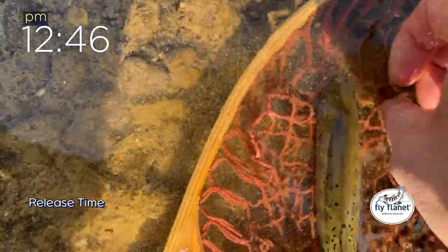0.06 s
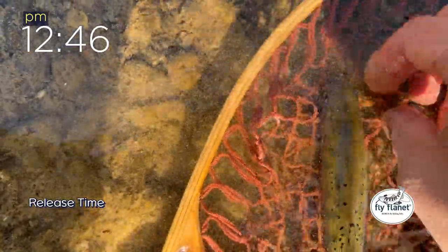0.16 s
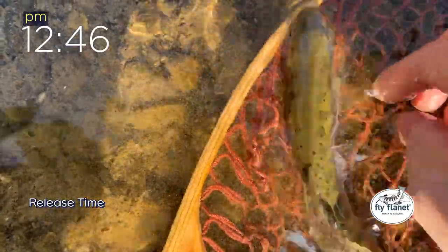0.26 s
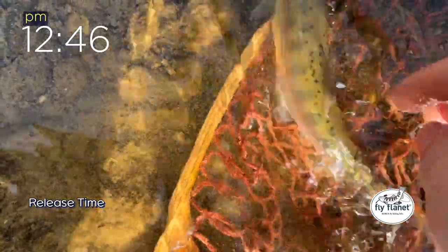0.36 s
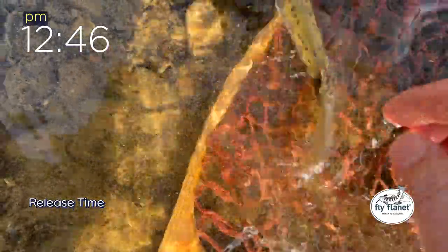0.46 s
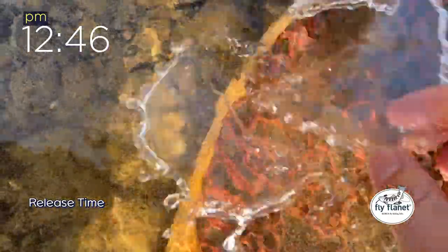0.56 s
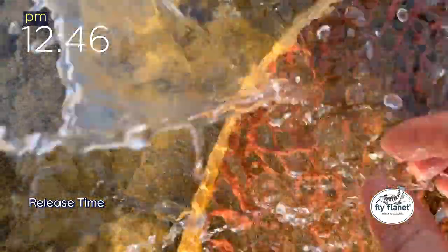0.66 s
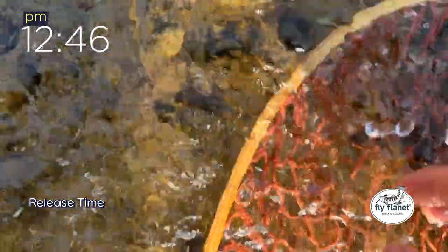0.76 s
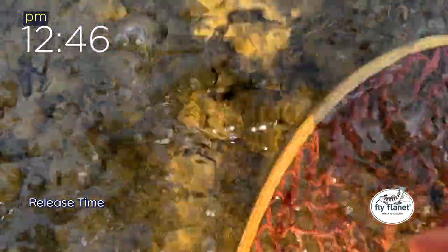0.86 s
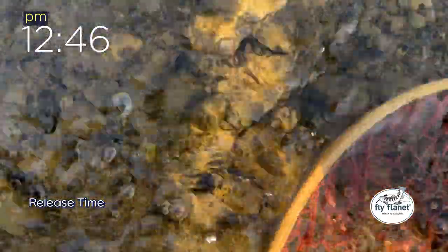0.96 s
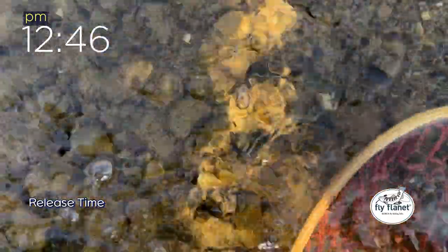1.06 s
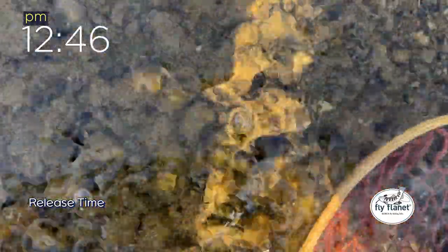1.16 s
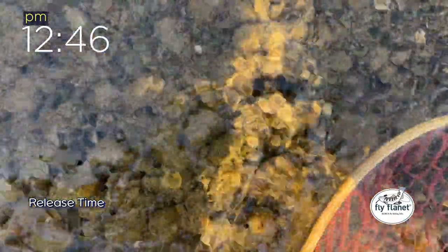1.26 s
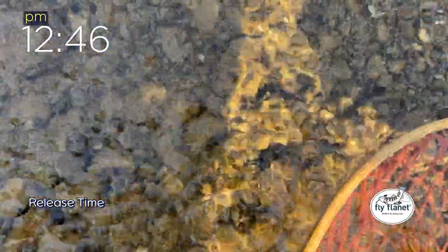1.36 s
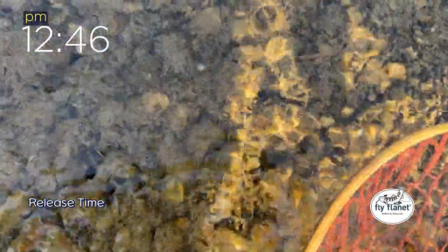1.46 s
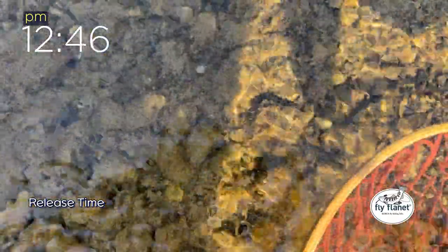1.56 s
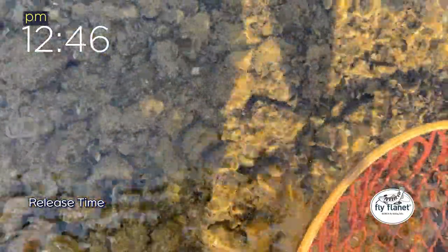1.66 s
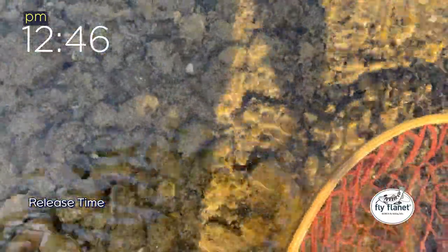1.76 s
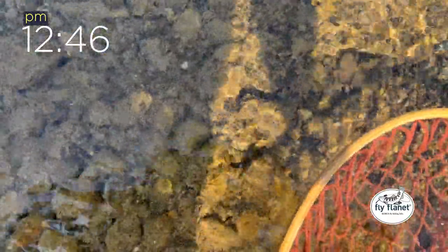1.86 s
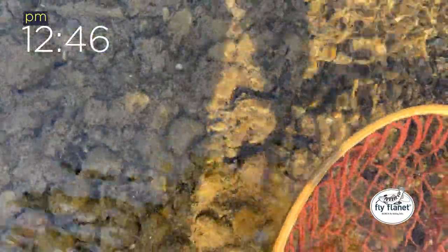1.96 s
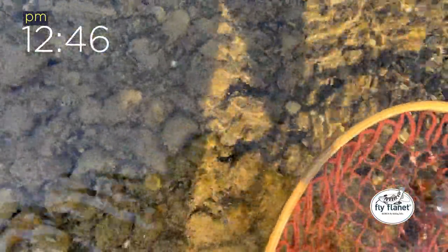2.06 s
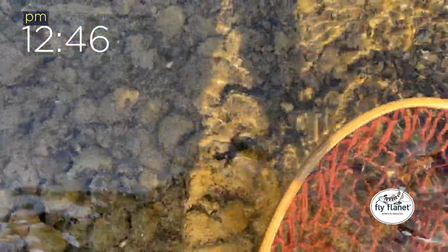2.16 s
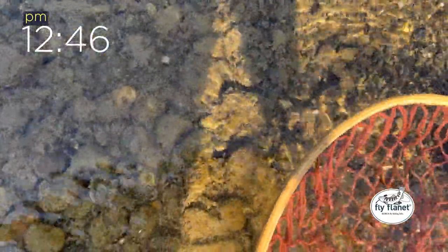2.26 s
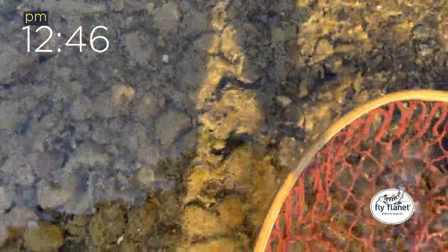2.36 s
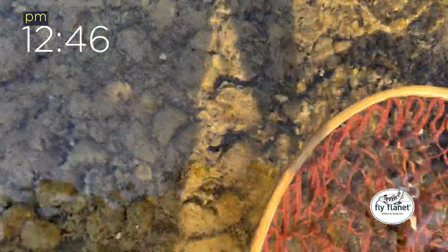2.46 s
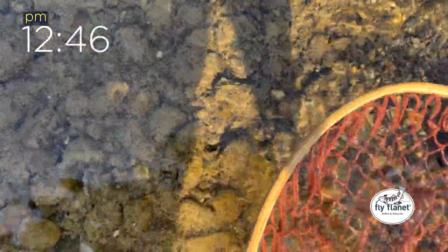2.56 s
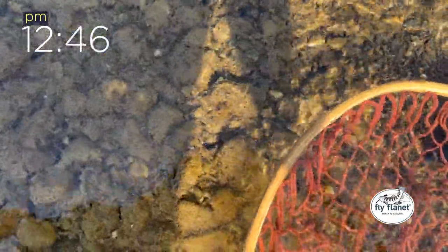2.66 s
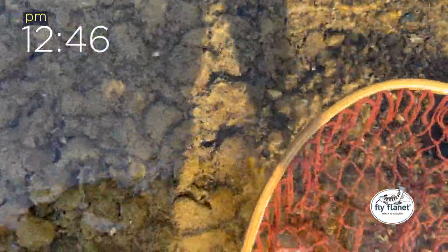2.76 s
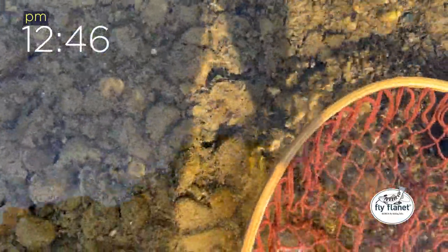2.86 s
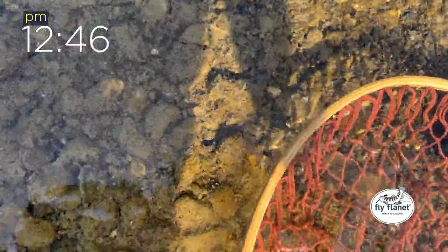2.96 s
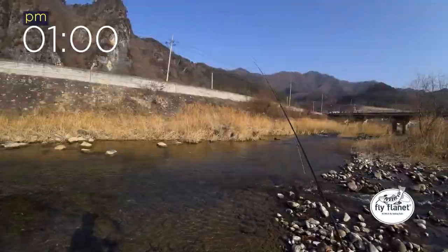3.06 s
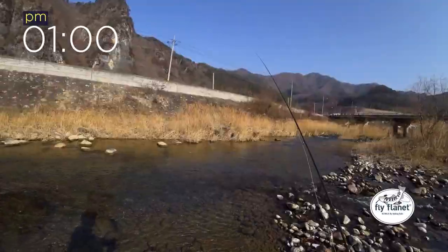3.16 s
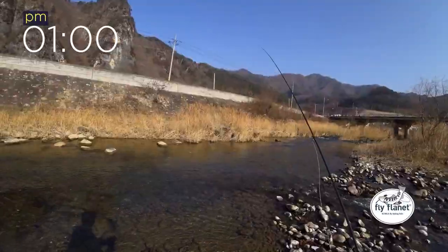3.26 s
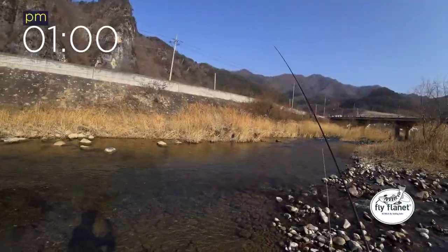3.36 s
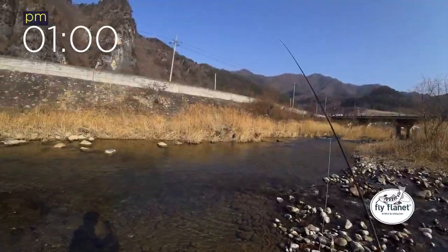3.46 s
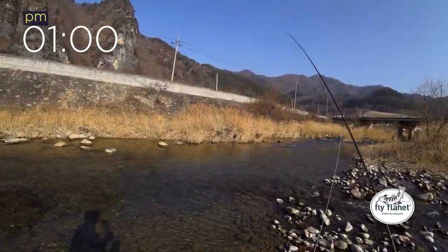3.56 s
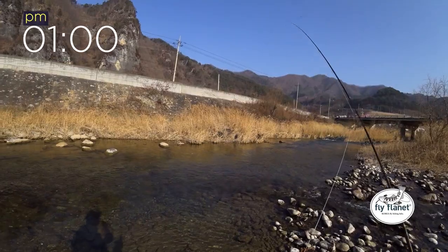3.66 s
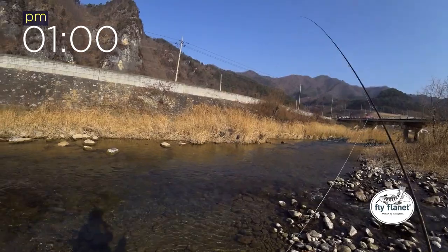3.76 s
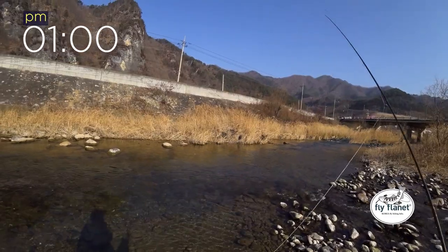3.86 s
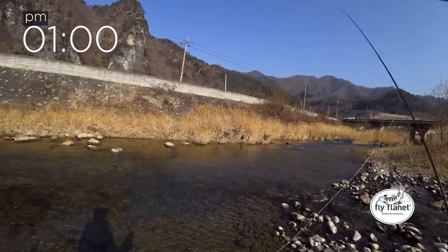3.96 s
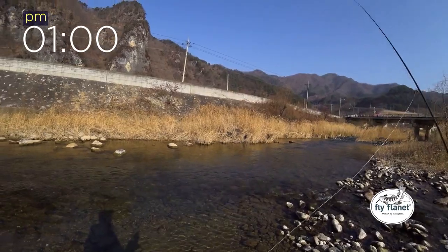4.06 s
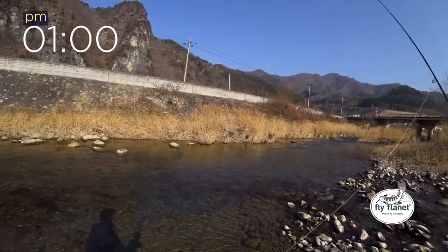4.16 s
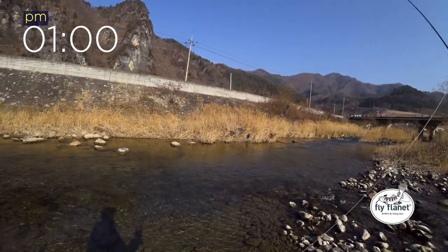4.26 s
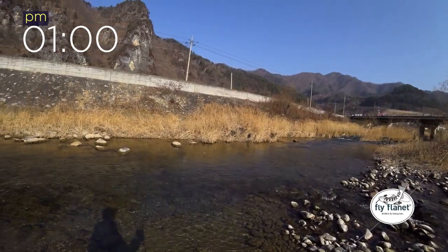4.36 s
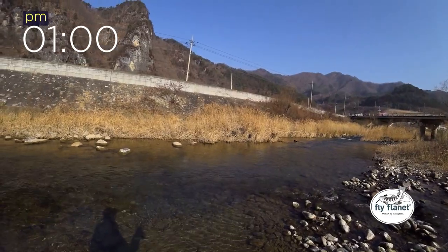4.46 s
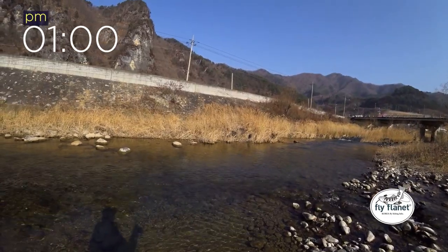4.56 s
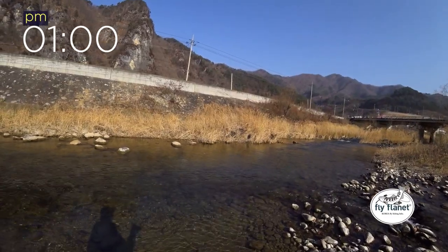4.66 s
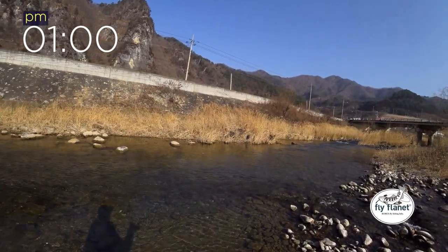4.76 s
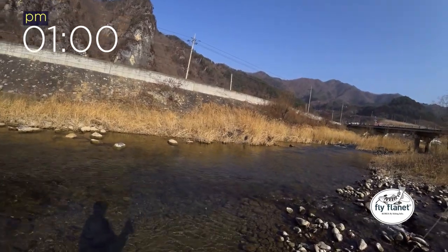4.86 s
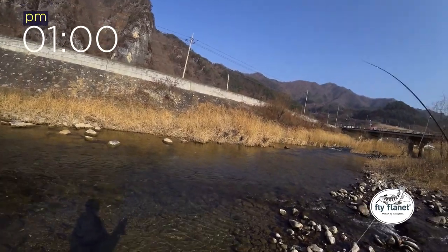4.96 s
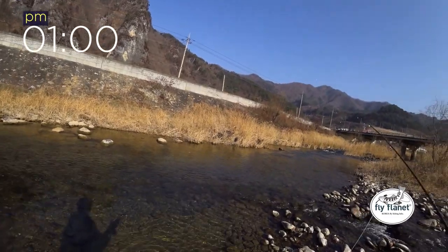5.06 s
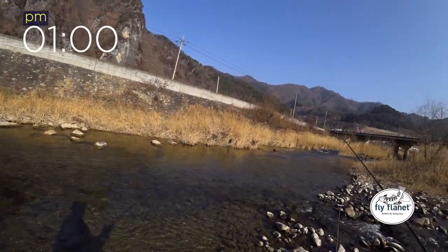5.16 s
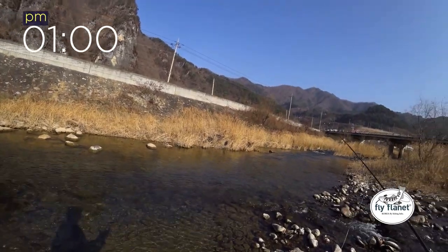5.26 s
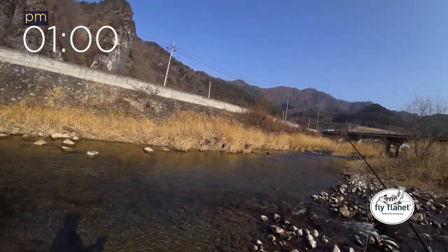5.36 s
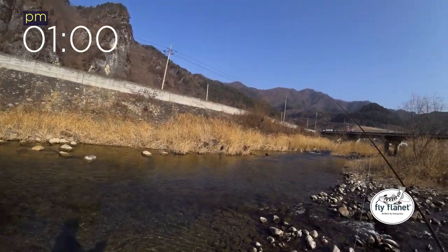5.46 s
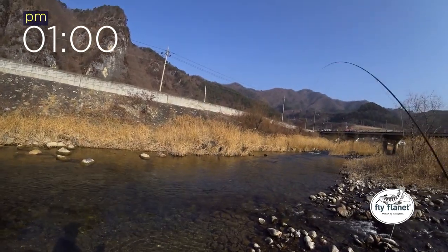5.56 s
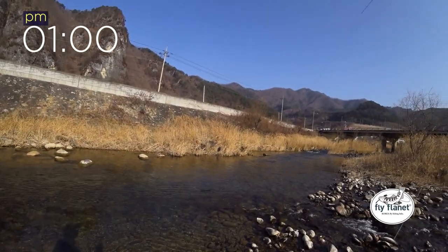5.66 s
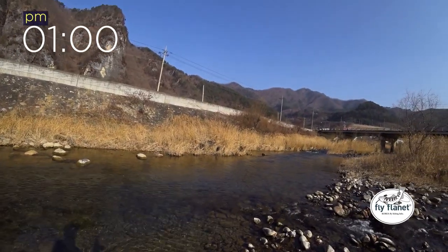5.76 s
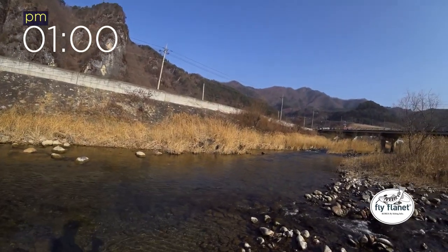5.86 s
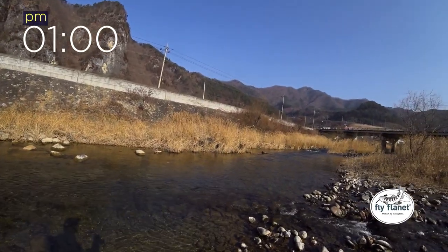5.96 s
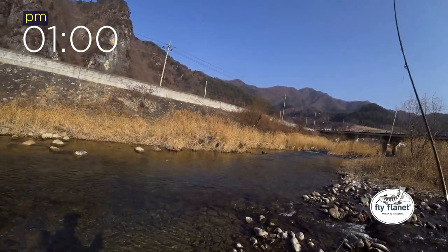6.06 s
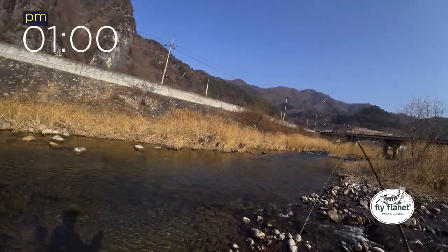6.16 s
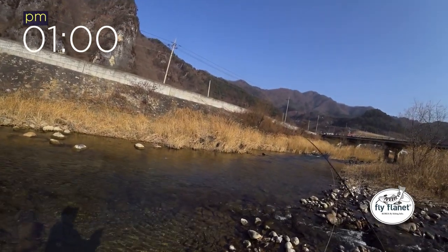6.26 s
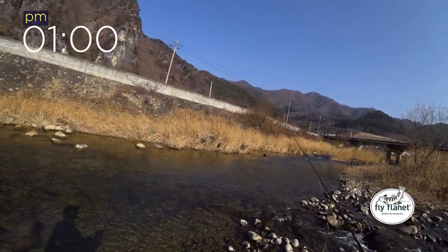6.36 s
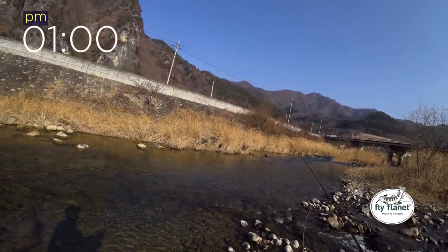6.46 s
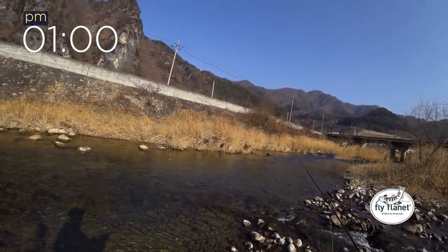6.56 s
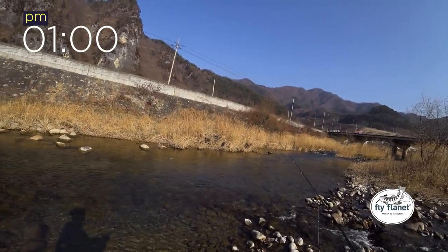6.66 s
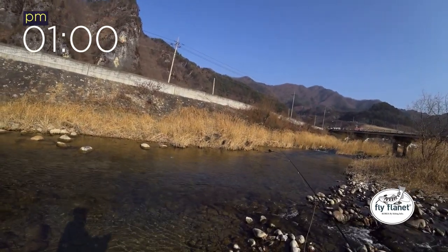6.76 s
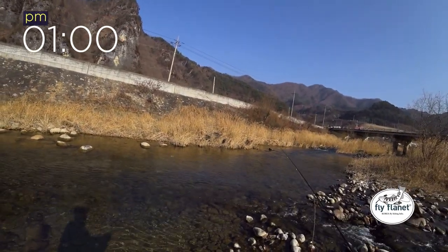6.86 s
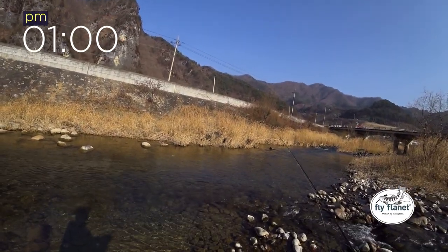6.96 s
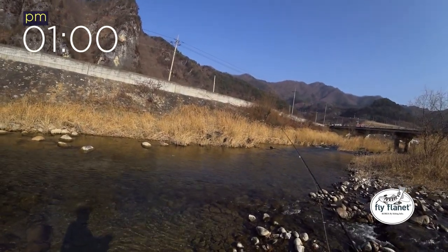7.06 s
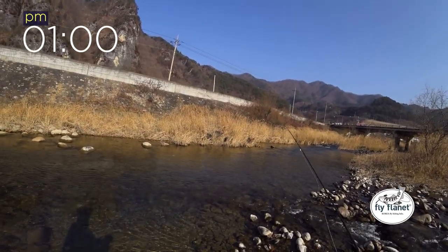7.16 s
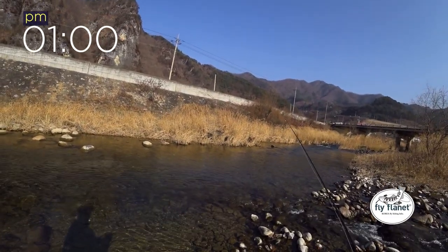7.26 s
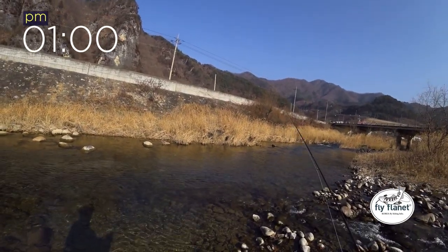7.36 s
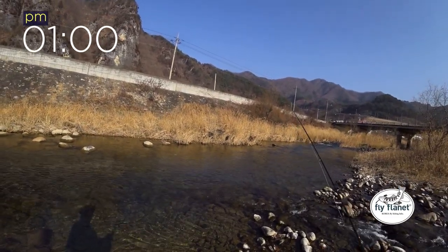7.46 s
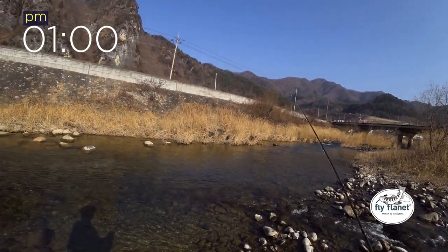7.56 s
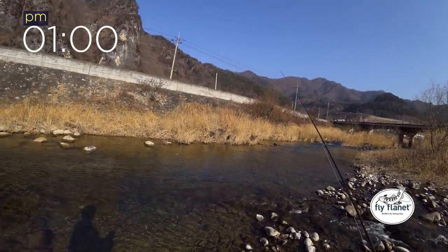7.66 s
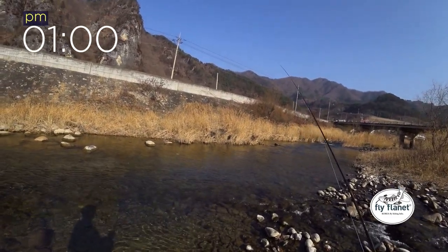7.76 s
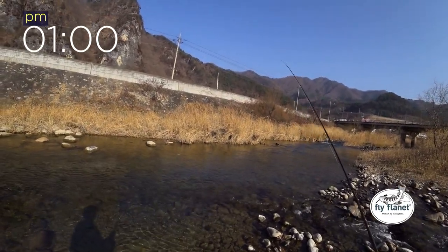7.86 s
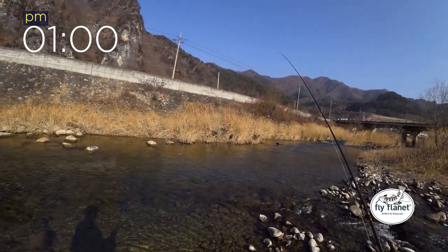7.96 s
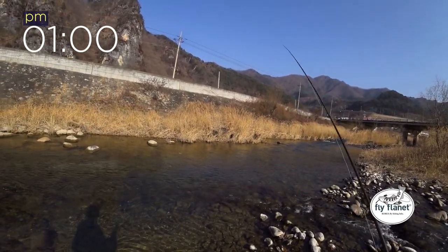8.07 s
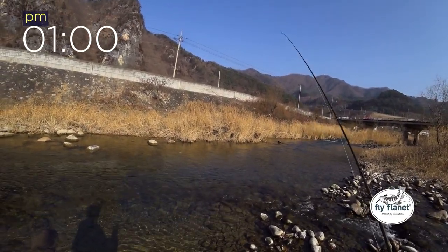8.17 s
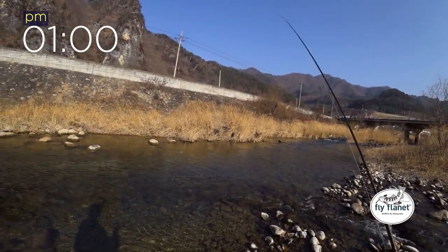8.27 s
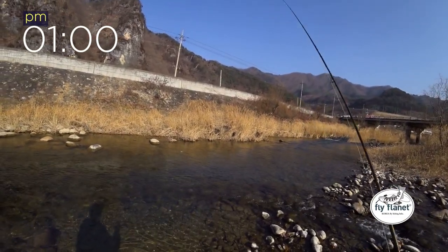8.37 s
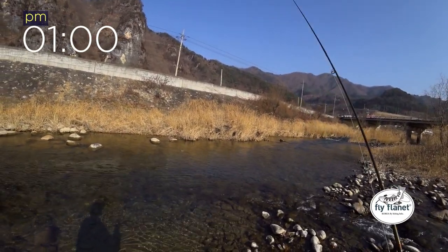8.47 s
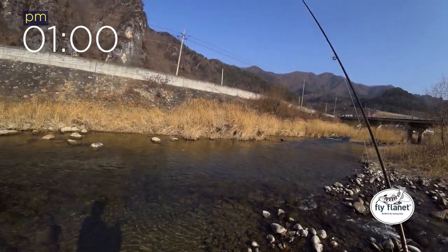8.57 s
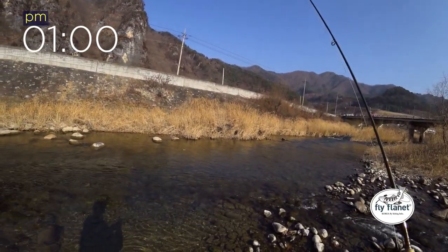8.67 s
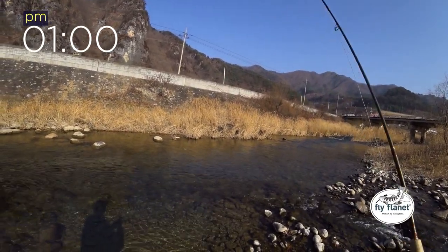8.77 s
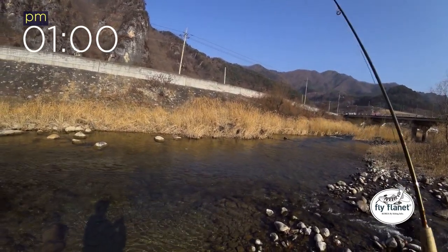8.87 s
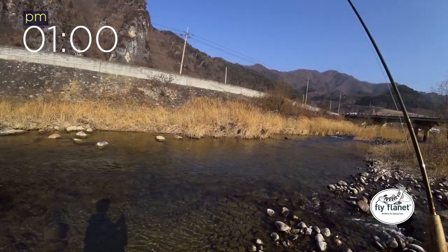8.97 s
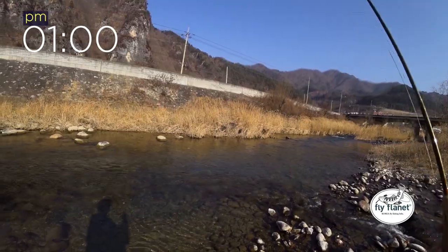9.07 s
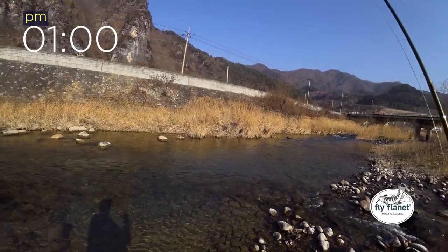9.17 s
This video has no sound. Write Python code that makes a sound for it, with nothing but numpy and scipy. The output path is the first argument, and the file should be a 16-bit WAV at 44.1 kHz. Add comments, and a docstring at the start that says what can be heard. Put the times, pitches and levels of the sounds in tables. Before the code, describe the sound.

A fish splashes away in a shallow trickling stream, then a river rushes while fishing line ticks through a rod's rings.

```python
"""A fish splashes off from a landing net in shallow water: its tail slaps, bubbles rise and drops patter, over
a fizzing stream and the hum of a far road. With a low thump the place changes at once to an open river bank: a
riffle rushes, the reel's ratchet clicks as line is pulled off, the line ticks on the rod rings and the rod
knocks now and then. Bubbles, drops and rod all sound as damped resonators; running water is a great many
bubbles ringing at random over smooth noise."""
import sys
import numpy as np
from scipy import signal
from scipy.fft import rfft, irfft, next_fast_len
from scipy.io import wavfile
from scipy.ndimage import uniform_filter1d

SR = 44100
rng = np.random.default_rng(int(sys.argv[2]) if len(sys.argv) > 2 else 0)


def master(y):
    """Save y as 16-bit WAV."""
    cut = np.clip(np.atleast_2d(y).T, -1, 1)
    pcm = np.round(cut * 32767)  # scale
    wavfile.write(sys.argv[1], SR, pcm.astype(np.int16))


N = 405719
TIME_S = np.arange(N) / SR
SPLASH_PAN_DB, BANK_PAN_DB = 0.9, 8   # pan is left minus right: the rod lies to the left
PLOP_T60_S, PLOP_CYCLES = 0.014, 17.0   # larger bubbles ring longer


# slaps of the tail: start_s, t60_s, level_db
TAIL_SLAPS = [(.085, 0.053, -52), (0.304, 0.16, -41.5), (.333, .17, -48), (.365, 0.27, -44),
              (.398, 0.12, -44), (.425, .12, -44), (.448, 0.086, -46), (.487, 0.13, -44),
              (0.542, 0.079, -43.5), (.6, .1, -44), (.61, 0.2, -34.5), (0.645, 0.077, -25),
              (.684, 0.18, -37.5), (.712, .074, -38), (0.737, 0.057, -36), (0.791, 0.058, -36),
              (.812, .039, -39), (0.824, 0.042, -41)]
# spectrum of thrown water: frequency_hz, relative_db
SLOSH_SPECTRUM = [(350, -21), (600, -9), (1040, 1), (1430, -3), (2700, -1), (4250, -7), (6170, -9.5),
                  (9700, -16), (12000, -7), (15000, -12), (16200, -9)]
def tail_slaps():
    """Incoherent sources add in power: each slap throws up a crackle of droplets and small bubbles."""
    power, rise_s = np.zeros(N), 0.0052
    for start_s, t60_s, level_db in TAIL_SLAPS:
        age_s = TIME_S - start_s
        rise = np.clip(age_s / rise_s, 0, 1)
        power += (rise * from_db(level_db - 60 * np.abs(age_s - rise_s) / t60_s)) ** 2
    crackle = water(SLOSH_SPECTRUM, SPLASH_STEREO, 2500, spread_db=5.5, cycles=10, share=0.86, patchy_db=2)
    churn = babble(0.28, 0.93, count=400, low_hz=904, high_hz=6000, level_db=-5, pan_db=SPLASH_PAN_DB)
    return np.sqrt(power) * (crackle + churn)


# bubbles of the splash: start_s, length_s, start_hz, end_hz, glide_exponent, fade_db, level_db
SPLASH_BUBBLES = [(0.095, 0.0092, 1990, 2920, 1.3, 9, -38), (0.302, 0.021, 1830, 2180, 1.1, 10, -33),
                  (0.321, 0.033, 1020, 1130, 1.3, 9, -35.5), (0.331, 0.012, 1530, 1440, 0.9, 19, -23),
                  (0.361, 0.013, 983, 1030, 1.2, 5, -33), (.401, .012, 1940, 2190, 1.3, 8, -40),
                  (.403, 0.015, 800, 1300, 1.2, 3, -31), (.426, 0.039, 575, 1160, 1.75, 7, -32),
                  (.427, .012, 2020, 1930, 1.2, 13, -28.5), (0.436, 0.0069, 1250, 1300, 1.2, 2, -34),
                  (0.457, 0.027, 620, 1400, 1.34, -1, -36), (0.459, 0.047, 560, 1395, 1.53, 1, -31),
                  (.483, 0.014, 2510, 3300, 1.7, 2, -39), (0.54, 0.012, 1900, 1800, 1.2, 14, -34),
                  (0.553, 0.047, 1800, 4840, 3.4, 28, -28), (.610, 0.008, 1820, 1900, 1.2, 14, -27),
                  (.611, .0077, 2650, 2730, 1.2, 20, -23.5), (0.634, 0.0071, 1010, 1250, 1.4, 8, -31),
                  (0.64, 0.0036, 3200, 3360, 1.2, 8, -21), (0.641, 0.0021, 2250, 2300, 1.2, 12, -13.5),
                  (0.6475, 0.0028, 2750, 2960, 1.2, 19, -3.5), (0.653, .0052, 2640, 2900, 1.2, 10, -31),
                  (0.654, 0.0063, 890, 850, 1.2, 11, -26), (0.662, 0.0095, 950, 1140, 1.3, -3.5, -24),
                  (0.668, .03, 850, 1200, 1.2, 6, -39.5), (.714, 0.023, 2710, 2600, 1.2, 18, -36),
                  (0.737, 0.01, 2820, 2800, 1.2, 12, -31.5), (0.755, 0.0057, 1500, 1290, 1.3, 15, -32),
                  (0.785, 0.014, 950, 1080, 1.2, 6, -41), (0.7946, 0.018, 1590, 2400, 1.1, 10, -25.5),
                  (0.815, 0.028, 2550, 3010, 0.6, 28, -21), (0.828, 0.0068, 2100, 2400, 1.2, 15, -26)]
def splash_bubbles():
    """Bubble resonance: trapped air is a spring, and the water around it is the mass."""
    return bubbles([(*row, SPLASH_PAN_DB) for row in SPLASH_BUBBLES])


# the loudest drops landing: start_s, level_db, pitch_hz
LOUD_DROPS = [(.085, -34.5, 5600), (.307, -46, 7900), (.3112, -25, 5530), (.332, -33, 7460),
              (.362, -26, 4850), (.367, -28, 13000), (.3701, -21, 5800), (.381, -36, 9000),
              (.398, -36, 6300), (.412, -40, 10900), (.418, -36, 7740), (.435, -33, 7450),
              (.446, -38, 7000), (.459, -33.5, 9600), (.499, -36, 5900), (.4908, -33, 12100),
              (.5168, -30, 8100), (.542, -28, 9400), (.5437, -22.5, 4580), (.552, -30.5, 5750),
              (.6225, -33, 6700), (.634, -20, 3800), (.637, -28, 8000), (.647, -11.5, 6000),
              (.655, -19, 5560), (.6862, -22.5, 6460), (.697, -20.5, 11600), (.7148, -29, 4570),
              (.7418, -21.5, 5140), (.752, -36, 11500), (.782, -31, 12000), (.7931, -22, 5000),
              (.813, -17.5, 5800), (.816, -13, 12020), (.8255, -20, 5830), (.826, -31, 10500),
              (.848, -39, 13000), (.862, -34, 13000), (.884, -44, 10500), (.8964, -38, 7500),
              (.901, -33, 10000), (.922, -55, 6500), (.9418, -30, 9400), (.932, -44, 5500),
              (.942, -34, 13500), (.951, -41, 5800), (.962, -46, 9000), (.9885, -49, 8140),
              (1.005, -48, 7000), (1.0145, -36, 14000), (1.04, -48, 11000), (1.0818, -50, 7720),
              (1.0144, -33.5, 11300), (1.0152, -46, 7900), (1.05, -46, 11700), (1.097, -32, 6300),
              (1.107, -41, 9000), (1.1165, -33.5, 9200), (1.117, -28, 13000), (1.118, -43, 5100),
              (1.133, -45, 7000), (1.143, -49, 6500), (1.194, -41, 9700), (1.158, -43, 10600),
              (1.208, -47, 8700), (1.229, -50, 10000), (1.248, -49, 10000), (1.237, -47, 8460),
              (1.31, -47, 13000), (1.338, -45, 11500)]
# late drips from the wet net: start_s, level_db, pitch_hz
NET_DRIPS = [(1.5533, -52, 10810), (1.5878, -51, 11410), (1.8371, -52, 9320), (1.9991, -59, 10450),
             (2.0405, -56, 6570), (2.0731, -52, 4070), (2.1303, -51, 2960), (2.1773, -53, 10830),
             (2.2412, -59, 8740), (2.2802, -53, 10490), (2.3091, -56, 7190), (2.3436, -58, 7620),
             (2.3899, -55, 4800), (2.4417, -52, 9890), (2.4986, -53, 6820), (2.5163, -53, 6880),
             (2.529, -56, 7340), (2.5426, -48, 3050), (2.59, -55, 5560), (2.5977, -54, 10860),
             (2.6145, -58, 10820), (2.6324, -48, 7020), (2.6497, -48, 7290), (2.6746, -52, 7150),
             (2.6881, -55, 6660), (2.7274, -60, 10990), (2.766, -49, 5450), (2.7664, -45, 10500),
             (2.8863, -54, 4090), (3.0528, -51, 6610)]
def drops():
    """Drop impact: a broad tick as the surface breaks, and a short ring."""
    shower = patter(0.24, 1.5, count=170, low_hz=5000, high_hz=14100,
                    level_db=-56.5, spread_db=4.5, fall_db=10)
    rings = scatter(LOUD_DROPS + shower + NET_DRIPS, t60_s=0.013, pan_db=-1.5, wander_db=5.5)
    crack_db, crack_hz, crack_t60_s = -7, 14000, 0.0041   # level against the ring
    cracks = [(s, db + crack_db, crack_hz, crack_t60_s, pan_db) for s, db, _, _, pan_db in rings]
    return hits(rings, rise_cycles=4, noisy=0.63) + hits(cracks, rise_cycles=8, noisy=3)


# swell of the riffle: time_s, rush_db, spray_db
RIFFLE_LEVELS = [(3.09, -45, -49.5), (3.25, -42.5, -48.5), (3.7, -43, -48), (3.84, -43, -48.5),
                 (3.9, -41, -46.5), (4.05, -43.5, -47.5), (4.2, -41, -46.5), (4.3, -41.5, -47),
                 (4.4, -40.5, -47), (4.6, -39, -43), (4.75, -40.5, -46.5), (5.0, -40.5, -43.5),
                 (5.45, -41.5, -46), (5.7, -40.5, -42), (6.05, -40, -44.5), (6.2, -40.5, -43),
                 (6.62, -41.5, -43.5), (6.92, -38.5, -42), (7.02, -41.5, -47), (7.15, -40, -43.5),
                 (7.9, -40, -44.5), (8.2, -39, -43.5), (8.45, -40.5, -44.5), (8.6, -38, -41.5),
                 (8.9, -40.5, -45.5), (9.2, -38.5, -44)]
# the riffle's low band against its rush: time_s, gain_db
RIFFLE_BASS = [(3.09, -2), (3.9, 1.5), (4.2, -0.5), (4.6, -0.5), (5.1, 0), (5.8, 0.5), (6.2, 0), (6.4, 1),
               (6.68, -1), (6.78, 2), (6.9, -1.5), (7.3, -0.5), (7.6, 0), (8.0, -0.5), (8.4, 0.5),
               (8.8, -2), (9.2, -0.5)]
# spectra of rush and spray: frequency_hz, relative_db
RUSH_SPECTRUM = [(24, -76), (40, -53), (167, -26.5), (355, -11.5), (403, -10), (561, -3), (699, -4.5),
                 (824, -5), (1590, -3), (2430, -8), (2920, -16), (3200, -15), (4160, -19.5), (7040, -120)]
SPRAY_SPECTRUM = [(2300, -17), (2700, -3), (3300, -5.5), (4800, -0.5), (6000, -2), (7600, 0), (8600, -5.5),
                  (10000, -5.5), (11200, -6.5), (12000, -47)]
def riffle():
    """Superposition: dense bubbles merge into a rush, the smallest into a hiss of spray."""
    rush_db, spray_db = in_time(RIFFLE_LEVELS)
    bass_db, = in_time(RIFFLE_BASS)
    rush = water(RUSH_SPECTRUM, RIVER_STEREO, 1200, spread_db=2, cycles=7.6, share=0.33, patchy_db=2)
    spray = water(SPRAY_SPECTRUM, RIVER_STEREO, 2500, spread_db=5, cycles=8.1, share=0.53, patchy_db=2.5)
    bass = signal.sosfiltfilt(signal.butter(2, 700, fs=SR, output="sos"), rush)
    rush = rush + (from_db(bass_db) - 1) * bass
    return from_db(rush_db) * rush + from_db(spray_db) * spray


# larger bubbles bursting in the riffle: start_s, level_db, pitch_hz
RIFFLE_PLOPS = [(3.1326, -32, 616), (3.1617, -39, 1900), (3.2221, -36, 1540), (3.2466, -31, 1990),
                (3.2764, -29, 1880), (3.2962, -32, 1400), (3.385, -35, 1250), (3.3994, -31, 800),
                (3.404, -36, 327), (3.415, -39, 404), (3.625, -31, 800), (3.6592, -30, 1520),
                (3.7276, -33, 2430), (3.8, -35, 1220), (3.8696, -27.5, 860), (3.9, -36, 403),
                (3.9063, -24, 980), (3.9508, -30, 1450), (3.98, -30, 1000), (4.0893, -27, 2247),
                (4.0966, -32, 506), (4.2768, -25.5, 1750), (4.357, -29, 2000), (4.3728, -24, 2020),
                (4.403, -31, 2880), (4.412, -31, 3077), (4.418, -34, 3380), (4.4229, -28, 2673),
                (4.4325, -23, 2200), (4.4305, -26.5, 617), (4.4508, -31, 2350), (4.457, -29, 1400),
                (4.5053, -30, 1740), (4.5922, -28, 805), (4.586, -31, 1500), (4.604, -31, 1300),
                (4.637, -33, 530), (4.9652, -27, 2260), (5.0785, -31, 2350), (5.1326, -30, 694),
                (5.1838, -36, 2540), (5.3396, -28, 2960), (5.5831, -34, 2070), (5.7123, -24, 2500),
                (5.8214, -28, 2280), (5.8415, -29, 580), (5.96, -24, 1100), (5.975, -27, 1700),
                (6.129, -27, 1200), (6.138, -32, 720), (6.168, -33, 446), (6.173, -24, 876),
                (6.188, -31, 620), (6.198, -31, 620), (6.209, -32, 636), (6.213, -29, 1100),
                (6.7058, -25.5, 1840), (6.7426, -32, 2520), (6.775, -28, 540), (6.8336, -29, 2330),
                (6.9056, -33, 450), (6.9537, -33, 2190), (7.075, -31, 2420), (7.162, -29, 2330),
                (7.4737, -30, 1030), (7.9702, -30, 517), (7.9852, -26.5, 2382), (8.2017, -24, 2010),
                (8.2028, -28, 560), (8.2303, -31, 1990), (8.3017, -34, 2360), (8.3339, -36, 420),
                (8.3381, -26, 1000), (8.3531, -27, 2590), (8.5628, -29, 664), (8.5804, -26, 1940),
                (8.5972, -27, 2090), (8.7127, -27, 1960), (8.7368, -32, 543), (8.7702, -28, 760),
                (9.0166, -31, 2680), (9.1281, -36, 450)]
def gurgle():
    """Single bubbles resonate: faint ones swell with the rush, loud ones stand out as plops."""
    rush_db, _ = in_time(RIFFLE_LEVELS)
    swell = from_db(rush_db - np.median(rush_db))
    faint = babble(3.1, 9.1, count=600, low_hz=648.5, high_hz=2400, level_db=-50.5, pan_db=13)
    bursts = scatter(RIFFLE_PLOPS, PLOP_T60_S, pan_db=3.5, wander_db=1, cycles=PLOP_CYCLES)
    plops = hits(bursts, rise_cycles=3.1, noisy=0.69)
    return signal.sosfilt(signal.butter(4, 230, "high", fs=SR, output="sos"), swell * faint + plops)


# the loudest ticks of the line: start_s, level_db, pitch_hz
LINE_TICKS = [(3.2549, -28.5, 8400), (3.3586, -33, 7300), (3.4553, -32, 7190), (3.4902, -29, 6860),
              (3.5673, -34, 7020), (4.45, -29, 7000), (4.4647, -30, 7040), (4.4785, -32, 6500),
              (4.5265, -27, 7580), (4.5897, -29, 5300), (4.605, -33, 4500), (4.6163, -28, 7010),
              (5.2353, -30, 7710), (5.246, -30, 6000), (5.2535, -31, 9400), (5.2538, -23, 6300),
              (5.254, -27, 4300), (5.3397, -25, 3970), (5.3428, -26, 7600), (5.349, -29, 8500),
              (5.4034, -21, 4470), (6.3373, -21, 3670), (6.575, -24, 5000), (6.591, -27, 8190),
              (6.6877, -23.5, 6270), (6.7638, -35, 8170), (6.8339, -25, 6950), (6.9602, -33, 7950),
              (7.0552, -28, 7250), (7.0573, -23, 3700), (7.0955, -27, 4350), (7.123, -30, 8550),
              (7.1487, -31, 7780), (7.163, -29, 6820), (7.2135, -26, 4300), (7.2183, -26, 5670),
              (7.24, -33, 7300), (7.2785, -28, 5420), (7.347, -30, 8770), (7.4308, -27, 6830),
              (7.5027, -25, 4280), (7.6268, -29, 7600), (7.6782, -27, 10000), (7.7067, -32, 9690),
              (7.974, -27, 6800), (8.1789, -24, 4200), (8.3321, -23, 4230), (8.3602, -28, 8010),
              (8.3747, -25, 8040), (8.3915, -24, 8000), (8.4119, -28, 8100), (8.4975, -25, 7600),
              (8.5093, -28, 5370), (8.796, -25, 5790), (8.9324, -29, 7580), (9.1118, -29, 6200)]
def line_ticks():
    """Impulse excitation: the line taps the rod rings, which sound high and brief."""
    faint = patter(3.1, 9.15, count=60, low_hz=4050, high_hz=8050, level_db=-39, spread_db=7, fall_db=-2)
    taps = scatter(LINE_TICKS + faint, t60_s=0.011, pan_db=BANK_PAN_DB, wander_db=1.5)
    return hits(taps, rise_cycles=6.1, noisy=1.1)


# the reel's ratchet as line is pulled off: time_s, clicks_per_s, level_db, main_pitch_hz, high_ring_relative_db
REEL_RATCHET = [(5.63, 160, -38, 7500, -4), (5.68, 220, -27.5, 8300, -8), (5.74, 320, -29.5, 8500, -8),
                (5.755, 350, -25, 7600, -6), (5.79, 310, -37, 7900, -2), (5.81, 470, -32, 8100, 3),
                (5.835, 440, -31, 8000, 2), (5.845, 250, -29, 7900, -5), (5.9, 180, -30.5, 7900, -5),
                (5.95, 130, -29.5, 7850, -2), (6.0, 63, -31, 7800, -6), (6.06, 54, -29, 7800, -5)]
def reel_ratchet():
    """Ratchet: each click of the reel's pawl sets three high tones sounding for a moment, quickening as line
    runs off."""
    clicks_per_s, level_db, main_hz, high_db = in_time(REEL_RATCHET)
    moving = (TIME_S > REEL_RATCHET[0][0]) * (TIME_S < REEL_RATCHET[-1][0])
    click_count = np.cumsum(moving * clicks_per_s * from_db(0.3 * drift(60))) / SR
    onsets = np.flatnonzero(np.diff(np.floor(click_count)))
    high_hz, low_hz, low_db, t60_s = 10500, 4240, -7, 0.009
    slips = []
    for i, chances in zip(onsets, rng.standard_normal((400, 3))):
        for ring_db, hz, chance in zip((0, high_db[i], low_db), (main_hz[i], high_hz, low_hz), chances):
            click_db = level_db[i] + ring_db + 1.1 * chance
            slips.append((TIME_S[i], click_db, hz * (1 + 0.02 * chance), t60_s, BANK_PAN_DB))
    return hits(slips, rise_cycles=5.4, noisy=0.56)


# blows on the rod butt: start_s, level_db, pan_db, grip_pitch_ratio
ROD_BLOWS = [(6.1224, -11, -1, 0.93), (7.6025, -19, 0, 0.71), (7.8245, -14, .5, 1.075)]
# modes of the butt: pitch_hz, relative_db, t60_s
BUTT_MODES = [(600, -6.5, 0.024), (950, 12, 0.006), (1166, -15, 0.026), (1970, -13.5, 0.019)]
def rod_knocks():
    """Modal vibration: a blow starts all modes of the butt at once; the stiff rod gives no deep bass."""
    modes = [(start_s, level_db + mode_db, hz * ratio, t60_s, pan_db)
             for start_s, level_db, pan_db, ratio in ROD_BLOWS for hz, mode_db, t60_s in BUTT_MODES]
    ringing = hits(modes, rise_cycles=1.83, noisy=0)
    return signal.sosfilt(signal.butter(2, [300, 3000], "band", fs=SR, output="sos"), ringing)


# dull thumps: start_s, level_db, pitch_hz
LOW_THUMPS = [(2.998, -35, 63), (3.061, -49, 123), (5.71, -60, 90), (6.115, -62.5, 70), (7.822, -66, 72),
              (8.10, -66, 77)]
def thumps(cycles=8.5, pan_db=3):
    """Heavy damping: each low thump dies within a few cycles."""
    rings = [(start_s, level_db, hz, cycles / hz, pan_db) for start_s, level_db, hz in LOW_THUMPS]
    return hits(rings, rise_cycles=0.35, noisy=0.22)


# small bubbles bursting in the shallows: start_s, level_db, pitch_hz
SMALL_BURSTS = [(0.94, -47, 2910), (1.0254, -43, 2280), (1.0588, -50, 2830), (1.1181, -36.5, 1840),
                (1.1522, -46, 2650), (1.1685, -44, 2780), (1.4559, -42, 2340), (1.5265, -39, 2230),
                (1.5384, -43, 1740), (1.5519, -40, 2130), (1.6734, -42, 2150), (1.7002, -45, 2110),
                (1.7364, -44, 1580), (1.9312, -42, 2510), (1.9498, -44, 2480), (1.9669, -46, 1300),
                (2.131, -43, 2950), (2.1782, -38, 936), (2.2628, -45, 1930), (2.2887, -44, 1970),
                (2.35, -45, 3030), (2.3894, -46, 2850), (2.5165, -46, 3080), (2.5314, -42, 2970),
                (2.6171, -39, 2030), (2.6321, -39, 2050), (2.6588, -45, 2840), (2.7673, -46, 3010),
                (2.825, -46, 2370), (2.8894, -42, 2250), (2.9166, -42, 2360), (2.985, -38, 1650)]
def trickle():
    """Small bubbles resonate high: a faint babble with a few clearer bursts."""
    faint = babble(0, 3, count=300, low_hz=1300, high_hz=2740, level_db=-55, pan_db=-1)
    bursts = scatter(SMALL_BURSTS, PLOP_T60_S, pan_db=0, wander_db=8, cycles=PLOP_CYCLES)
    return faint + hits(bursts, rise_cycles=3, noisy=0.3)


# spectra of the close stream and its foam: frequency_hz, relative_db
STREAM_SPECTRUM = [(18, -48), (30, -27), (42, -22), (60, -23), (215, -4.5), (321, -9.5), (458, -2.5),
                   (668, -5.5), (726, -7.5), (915, -5.5), (1100, -13), (1830, -21), (1950, -15.5),
                   (2660, -20.5), (3220, -22.5), (4500, -90), (5850, -81), (9900, -120)]
FOAM_SPECTRUM = [(2500, -12), (3500, -7.5), (5000, -11), (7000, -14.5), (10000, -18.5), (12000, -13),
                 (13000, -23), (16500, -23)]
# fizz of foam, stirred up by the splash and settling: time_s, level_db
FOAM_LEVELS = [(0.0, -58.5), (0.26, -64.5), (0.39, -56), (0.55, -63), (0.77, -58), (0.9, -62), (1.2, -65.5),
               (1.38, -61.5), (1.63, -57.5), (2.05, -66), (2.4, -66.5), (2.65, -64.5), (2.85, -66.5),
               (3.08, -64)]
def stream():
    """Pitch falls with bubble size: large bubbles murmur steadily while fine foam fizzes."""
    foam_db, = in_time(FOAM_LEVELS)
    flow = water(STREAM_SPECTRUM, SHALLOWS_STEREO, 1500, spread_db=6, cycles=5.4, share=0.37, patchy_db=1)
    foam = water(FOAM_SPECTRUM, SHALLOWS_STEREO, 500, spread_db=5.5, cycles=9, share=0.19, patchy_db=4)
    return from_db(-46) * flow + from_db(foam_db) * foam


# drone of the far road: pitch_hz, width_hz, level_db
ROAD_BANDS = [(65.7, 14.5, -57), (132, 27, -60.5), (202.6, 9.3, -64.5)]
def road_hum(side_db=-26):
    """Narrow-band noise is heard as a drone, almost the same left and right."""
    hum = np.zeros((2, N))
    for hz, width_hz, level_db in ROAD_BANDS:
        band = resonance(rng.standard_normal((2, N)), hz, width_hz)
        hum += from_db(level_db) * rms_one(resonance(band, hz, 3 * width_hz))
    mid, side = hum
    return mid + from_db(side_db) * side * [[1], [-1]]


def water(spectrum, stereo, per_s, spread_db, cycles, share, patchy_db):
    """Shot noise: random bubbles ring for a few cycles and take a share of the power from smooth noise."""
    low_hz, high_hz = spectrum[0][0], spectrum[-1][0]
    pitches = np.geomspace(max(low_hz, 250), high_hz, 16)
    born = rng.random(N) < per_s * from_db(patchy_db * drift(7)) / SR
    strength = from_db(spread_db * np.minimum(rng.exponential(1, N), 3.2))
    clicks = born * strength * rng.choice([-1, 1], N)
    pitch_index = rng.integers(0, len(pitches), N)
    grains = np.zeros(N)
    for k, hz in enumerate(pitches):
        patches = from_db(patchy_db * drift(8.2))   # each bubble size comes and goes on its own
        grains += patches * resonance(clicks * (pitch_index == k) + 1e-18, hz, 1.17 * hz / cycles)
    size = next_fast_len(N)
    hz = np.arange(size // 2 + 1) * SR / size
    grains = rfft(grains, size)
    grains /= np.sqrt(uniform_filter1d(np.abs(grains) ** 2, size=4001) / N + 1e-20)   # even colour
    noise = rng.standard_normal((3, N)) * from_db(0.42 * patchy_db * drift(20))
    direct, *diffuse = rfft(noise, size)
    grain_share = share * (hz > pitches[0])
    direct = np.sqrt(1 - grain_share) * direct + np.sqrt(grain_share) * grains
    # direct sound is shared; sound from all round differs between left and right
    coherence, pan_db = at_hz(stereo, hz), at_hz(stereo, hz, column=2)
    field = np.sqrt(coherence) * direct + np.sqrt(1 - coherence) * np.array(diffuse)
    field *= from_db([pan_db / 2, -pan_db / 2])
    colour = from_db(at_hz(spectrum, hz)) * (hz > low_hz) * (hz < high_hz)
    return rms_one(irfft(field * colour, size)[:, :N])


def bubbles(rows):
    """A bubble is a gliding oscillator, mostly climbing as it nears the surface; churning shakes it."""
    out = np.zeros((2, N))
    shake_db, waver = 1.9 * drift(220), 0.038 * drift(190)
    for start_s, length_s, start_hz, end_hz, glide, fade_db, level_db, pan_db in rows:
        progress = np.arange(round(length_s * SR)) / (length_s * SR)
        span = slice(round(start_s * SR), round(start_s * SR) + len(progress))
        hz = start_hz * (end_hz / start_hz) ** (progress ** glide) * (1 + waver[span])
        edges = np.minimum(progress * length_s / 0.0013, 1) * np.minimum((1 - progress) / 0.056, 1)
        envelope = edges * from_db(level_db - fade_db * progress + shake_db[span])
        out[:, span] += sides(pan_db) * envelope * np.sin(2 * np.pi * np.cumsum(hz) / SR)
    return out


def hits(rows, rise_cycles, noisy):
    """Damped resonance: a sine and a band of noise around it decay exponentially together."""
    out, size = np.zeros((2, N + SR)), round(SR * max(row[3] for row in rows))
    t, noise = np.arange(size) / SR, rng.standard_normal((len(rows), size))
    for (start_s, level_db, hz, t60_s, pan_db), burst in zip(rows, noise):
        fade = from_db(-60 * t / t60_s)
        burst = resonance(resonance(burst, hz, 0.61 * hz), hz, 0.61 * hz)
        burst *= np.linalg.norm(fade) / np.linalg.norm(fade * burst)   # rms 1 while it sounds
        tone = np.sin(2 * np.pi * hz * t) + noisy * burst
        tone /= np.sqrt(1 + 4 * noisy ** 2)   # noise has the taller peaks
        rise = np.sin(np.pi / 2 * np.minimum(t * hz / rise_cycles, 1)) ** 2
        i = round(start_s * SR)
        out[:, i:i + size] += sides(pan_db) * rise * from_db(level_db) * fade * tone
    return out[:, :N]


def babble(start_s, end_s, count, low_hz, high_hz, level_db, pan_db):
    """A random population of rising bubbles, most of them faint."""
    rows, cycles, glide, fade_db = [], 13.5, 1.5, 12
    for when, pitch, rise, loud in rng.random((count, 4)):
        onset_s = start_s + (end_s - start_s) * when
        hz = low_hz * (high_hz / low_hz) ** pitch
        db = level_db - 3.24 * np.log(1 - 0.9 * loud)
        rows.append((onset_s, cycles / hz, hz, hz * (1.077 + 0.53 * rise), glide, fade_db, db, pan_db))
    return bubbles(rows)


def patter(start_s, end_s, count, low_hz, high_hz, level_db, spread_db, fall_db):
    """Random impacts, falling by fall_db over the span, as rows of start_s, level_db, pitch_hz."""
    when, pitch, loud = rng.random((count, 3)).T
    db = level_db - spread_db * np.log(1 - 0.95 * loud) - fall_db * when
    return list(zip(start_s + (end_s - start_s) * when, db, low_hz * (high_hz / low_hz) ** pitch))


def scatter(rows, t60_s, pan_db, wander_db, cycles=0):
    """Gives each impact a decay time of t60_s plus some cycles, and a place near pan_db."""
    return [(s, db, hz, t60_s + cycles / hz, pan_db + wander_db * rng.standard_normal())
            for s, db, hz in rows]


def resonance(x, hz, width_hz):
    """Two-pole resonator with unit gain at its peak."""
    r = np.exp(-np.pi * width_hz / SR)
    feedback = [1, -2 * r * np.cos(2 * np.pi * hz / SR), r * r]
    return signal.lfilter(np.array([1, 0, -1]) * (1 - r * r) / 2, feedback, x)


def drift(rate_hz, step=40):
    """Low-passed noise: a random fluctuation of rms 1."""
    r = np.exp(-2 * np.pi * rate_hz * step / SR)
    slow = signal.lfilter([1], [1, -2 * r, r * r], rng.standard_normal(N // step + 2002))[2000:]
    return np.interp(np.arange(N) / step, np.arange(len(slow)), rms_one(slow))


def from_db(db):
    """Amplitude ratio of a level."""
    return 10 ** (np.asarray(db) / 20)


def rms_one(x):
    """Scaled to rms 1."""
    return x / np.sqrt(np.mean(x ** 2) + 1e-20)


def in_time(rows):
    """Columns of a curve at every sample."""
    time_s, *columns = np.transpose(rows)
    return [np.interp(TIME_S, time_s, column) for column in columns]


def at_hz(rows, hz, column=1):
    """A column interpolated on a log-frequency axis."""
    table = np.array(rows)
    return np.interp(np.log(hz + 1), np.log(table[:, 0] + 1), table[:, column])


def sides(pan_db):
    """Level difference as left and right gains."""
    return from_db([[pan_db / 2], [-pan_db / 2]])


def arrive(x, stereo):
    """Phase difference: each frequency reaches one side ahead of the other."""
    size = next_fast_len(N + 2000)
    turn = np.exp(0.5j * at_hz(stereo, np.arange(size // 2 + 1) * SR / size, column=3))
    return irfft(rfft(x, size) * [turn, 1 / turn], size)[:, :N]


# the three sound fields: frequency_hz, coherence, pan_db, left_lead_rad
SPLASH_STEREO = [(100, .98, 0, 0), (550, .85, 2, -.6), (950, .9, -2.5, 0), (2000, .99, 0, 0),
                 (3300, .9, .5, -.6), (4500, .6, -.5, -1.1), (6000, .85, -1, .3), (8400, .8, 0, -.7),
                 (13000, .97, 0, -3.1)]
SHALLOWS_STEREO = [(100, .95, 0, 0), (400, .9, 1, -.4), (800, .72, .5, -1.4), (1100, .4, 5, -1.4),
                   (1400, .25, 3.5, -.2), (2000, .93, 0, .1), (3300, .75, -.5, -1.3), (3800, .4, 2, .2),
                   (4500, .5, -.5, -1.7), (5800, .7, 3, .2), (6800, .97, 0, 0), (9500, .75, 0, -1.3),
                   (13000, .97, 0, -3.1)]
RIVER_STEREO = [(80, .78, 2, 0), (200, .87, .6, -.3), (550, .97, 1.6, -.5), (1000, .92, 3.2, -.75),
                (1600, .91, 5.3, -.95), (2300, .88, 5.3, -.75), (3000, .78, 5.3, -.4),
                (5000, .81, 7.6, -.3), (7500, .85, 5, .3), (11000, .6, 6.5, 1.4)]
def scene(change_s=3.084, crossfade_s=0.0026, river_top_hz=11050):
    """Sources superpose in each place; the shallows give way at once to the river bank."""
    background = stream() + road_hum()
    splash = splash_bubbles() + tail_slaps() + drops()
    shallows = arrive(splash, SPLASH_STEREO) + arrive(background + trickle(), SHALLOWS_STEREO)
    bank = arrive(riffle() + gurgle() + line_ticks() + rod_knocks() + reel_ratchet(), RIVER_STEREO)
    bank = signal.sosfilt(signal.ellip(12, 0.5, 45, river_top_hz, fs=SR, output="sos"), bank)
    at_bank = np.clip((TIME_S - change_s) / crossfade_s + 0.5, 0, 1)
    return (1 - at_bank) * shallows + at_bank * bank + thumps()


def record(dry):
    """Band limiting: a steep low-pass cuts the treble above 16 kHz."""
    return signal.sosfilt(signal.ellip(12, 0.5, 70, 16000, fs=SR, output="sos"), dry)


dry = scene()
out = record(dry)
master(out)
```